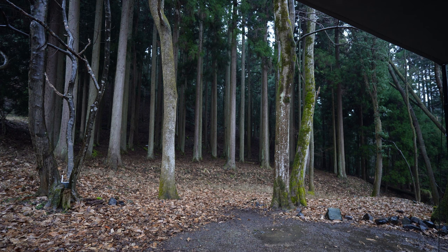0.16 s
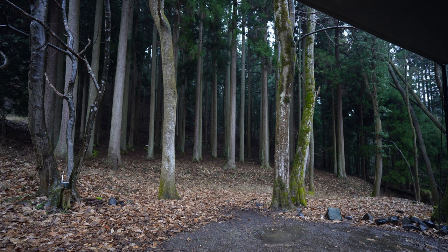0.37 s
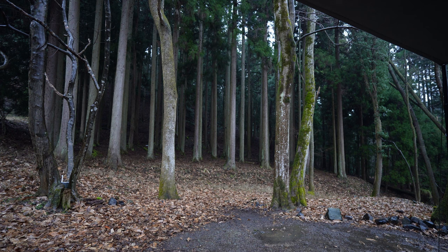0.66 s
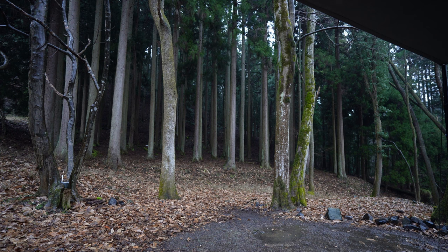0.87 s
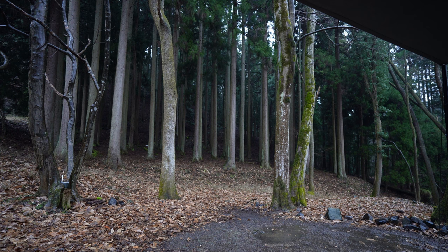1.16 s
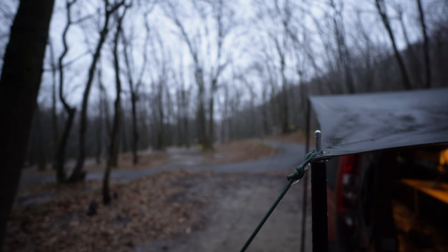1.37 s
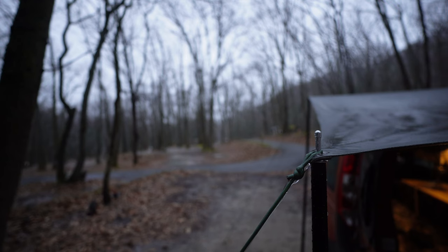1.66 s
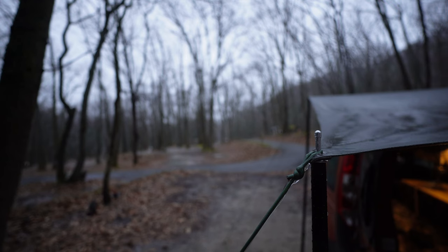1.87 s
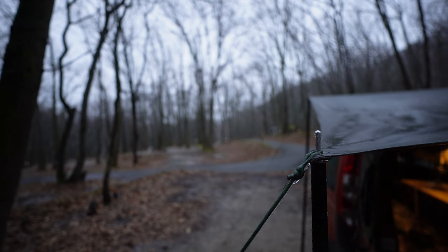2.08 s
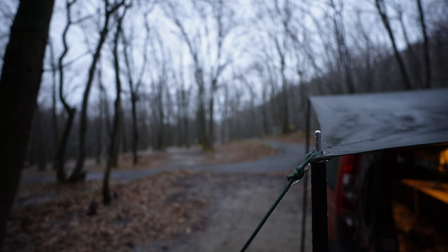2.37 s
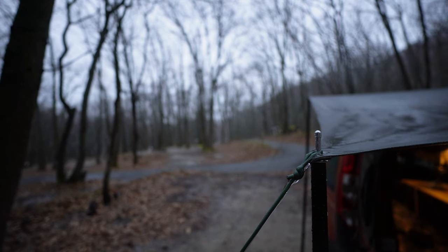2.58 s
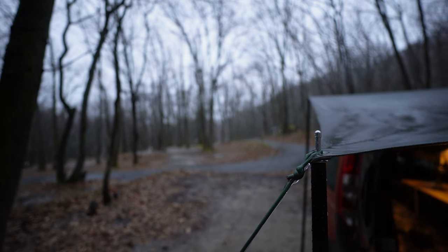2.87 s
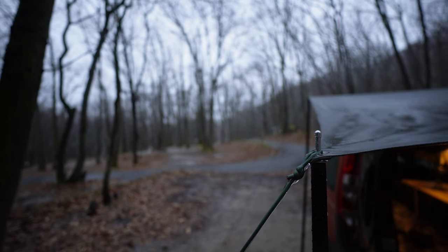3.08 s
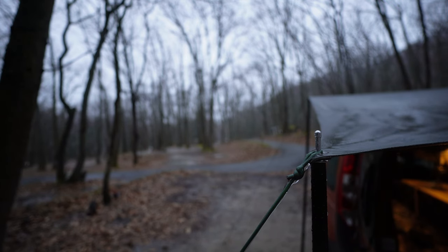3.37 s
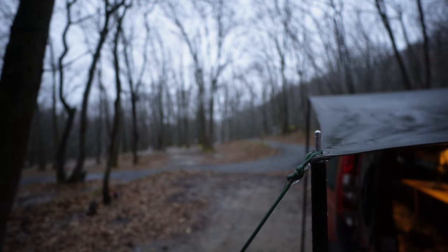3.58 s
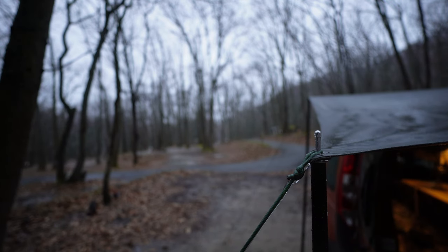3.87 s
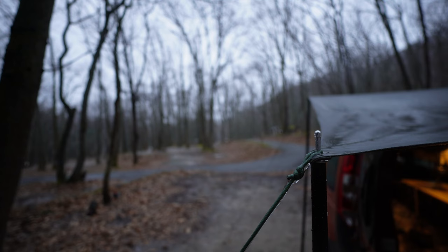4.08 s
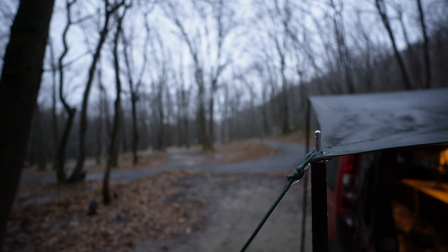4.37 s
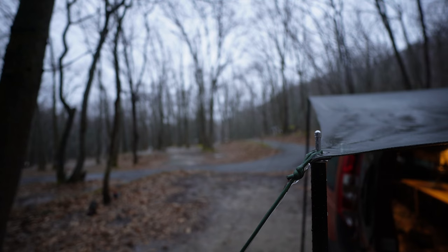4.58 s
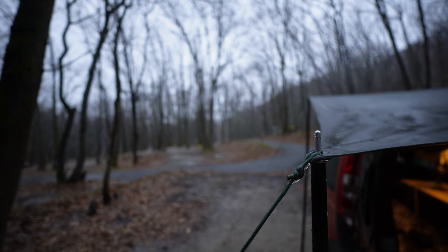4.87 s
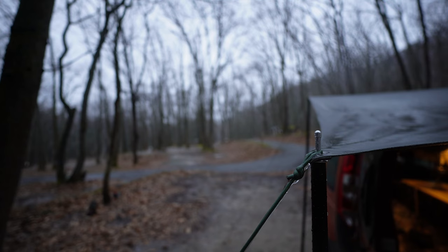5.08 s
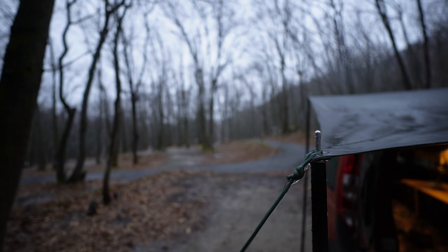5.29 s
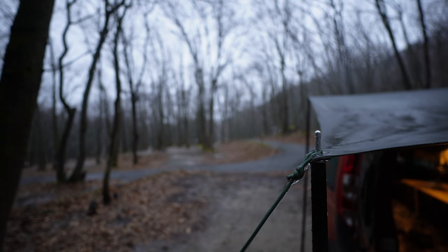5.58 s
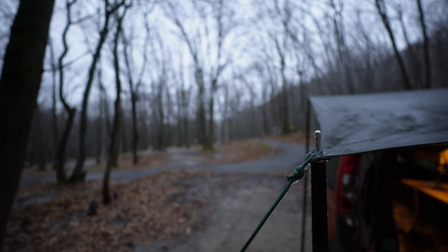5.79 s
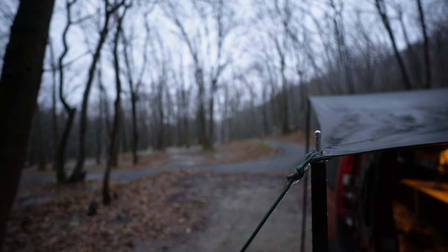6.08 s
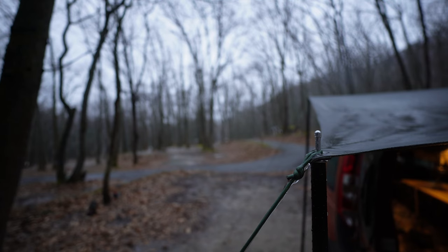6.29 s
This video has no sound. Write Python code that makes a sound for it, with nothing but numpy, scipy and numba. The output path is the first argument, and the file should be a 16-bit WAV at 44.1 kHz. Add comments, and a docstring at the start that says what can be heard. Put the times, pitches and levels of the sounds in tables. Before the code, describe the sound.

Heavy rain on a taut tarp in a wood, with big drips slapping and booming the cloth over a steady hiss.

```python
"""Heavy rain on a taut tarp in a wood, heard from just underneath. Big drips slap the cloth with a falling
ring, the whole sheet booms, and fine drops tick and splash over the hiss of rain farther off.
The microphone starts close over wet fallen leaves and blends to its place under the tarp over the first
two seconds or so. The recorder's limiter briefly ducks everything after the hardest slaps."""
import sys
import numpy as np
from scipy import signal
from scipy.fft import rfft, irfft
from scipy.io import wavfile
from scipy.ndimage import uniform_filter1d, minimum_filter1d
from numba import njit

SR = 44100
rng = np.random.default_rng(int(sys.argv[2]) if len(sys.argv) > 2 else 0)


def log_audio(samples):
    """Write samples as a 16-bit WAV file to the path given in sys.argv[1]."""
    # one column per channel
    frames = np.atleast_2d(samples).T
    # limit to full scale, then quantise
    limited = np.clip(frames, -1, 1)
    pcm = np.round(limited * 32767).astype(np.int16)
    wavfile.write(sys.argv[1], SR, pcm)


N = 284004
TOP_HZ = 16100  # upper edge of the recorder's band


def undb(db):
    return 10 ** (np.asarray(db) / 20)


def unit(x):
    return x / np.sqrt(np.mean(x ** 2))


@njit
def sum_rings(count, start, hz, t60, rise, bend, size, sr):
    """Damped sines that start at (1 + bend) times their pitch and sink to it; times in seconds."""
    out = np.zeros(count)
    for k in range(len(start)):
        first = int(start[k] * sr)
        fade = 1000. ** (-1 / (t60[k] * sr))
        open_up, sink = np.exp(-1 / (rise[k] * sr)), fade ** 2
        phase, level, shut, sharp = 0., size[k], 1., bend[k]
        for i in range(first, min(first + int(.7 * t60[k] * sr), count)):
            phase += 2 * np.pi * min(hz[k] * (1 + sharp), .45 * sr) / sr
            level, shut, sharp = level * fade, shut * open_up, sharp * sink
            out[i] -= level * (1 - shut) * np.sin(phase)
    return out


def ring(start, hz, t60, rise, bend, size):
    """One damped ring per start time; a single number applies to every ring."""
    columns = np.broadcast_arrays(np.clip(start, 0, None), hz, t60, rise, bend, size)
    return sum_rings(N, *(np.ascontiguousarray(c, float) for c in columns), float(SR))


def spray(start, db, hz, cycles, last_s, octaves, count, rise):
    """Each event throws a cluster of short rings that thin and fade over last_s; rise in cycles."""
    when, tone, strength = np.moveaxis(rng.random((len(start), count, 3)), -1, 0)
    late = last_s * when ** 2
    pitch = np.minimum(hz[:, None] * 2 ** (octaves * (2 * tone - 1)), TOP_HZ).ravel()
    size = undb(db[:, None] - 22 * late / last_s) * (2 * strength - 1)
    return ring((start[:, None] + late).ravel(), pitch, cycles / pitch, rise / pitch, 0, size.ravel())


def random_drops(per_s):
    """Start times in seconds, each with a draw from 0 to 1 for pitch and another for strength."""
    when, tone, strength = rng.random((int(per_s * N / SR), 3)).T
    return when * N / SR, tone, strength


def flicker(per_s):
    """Random levels, each held briefly, smoothed twice."""
    hold = int(SR / per_s)
    steps = np.repeat(rng.standard_normal(N // hold + 1), hold)
    return uniform_filter1d(uniform_filter1d(steps, hold), hold)[:N]


def patter(spectrum, low_hz, per_s, scatter_db, cycles, last_s, hiss_db, flicker_db):
    """Countless small drops, each a burst with its own colour and size, over the blur of distant ones."""
    hz, db = np.transpose(spectrum)
    start, tone, strength = random_drops(per_s)
    pitch = low_hz * (14000 / low_hz) ** tone ** 0.52
    # a short ring spreads its power over a band that widens with pitch
    colour_db = np.interp(np.log(pitch), np.log(hz), db) + 10 * np.log10(pitch)
    size_db = colour_db - scatter_db * np.log(1 - .97 * strength)
    drops = spray(start, size_db, pitch, cycles, last_s, octaves=0.76, count=6, rise=0.33)
    bins_hz = np.maximum(np.fft.rfftfreq(N, 1 / SR), 1)
    hiss_colour = undb(np.interp(np.log(bins_hz), np.log(hz), db))
    hiss = irfft(rfft(rng.standard_normal(N)) * hiss_colour, N)
    return unit(unit(drops) + undb(hiss_db + flicker_db * flicker(per_s=23.62)) * unit(hiss))


def rain_on_leaves():
    """Small drops strike the wet leaf litter: a bright, uneven patter."""
    # The colour of rain on leaves. Each row: frequency in Hz, relative spectral density in dB.
    spectrum = [(40, 7), (170, -3.5), (350, 6), (3000, -4), (5000, 0.5), (6300, -9), (9200, -8),
                (11500, -4.5), (15500, -7)]
    return patter(spectrum, low_hz=710, per_s=300, scatter_db=5.1, cycles=4.9, last_s=0.0055,
                  hiss_db=5.8, flicker_db=1.6)


def rain_on_tarp():
    """Small drops strike the cloth overhead: a darker, more even patter."""
    # The colour of rain on cloth. Each row: frequency in Hz, relative spectral density in dB.
    spectrum = [(40, 0), (100, 13.5), (200, -2.5), (500, 0), (1400, -11), (2600, -9.5), (6200, -22.5),
                (10000, -37), (13000, -47), (16000, -38)]
    return patter(spectrum, low_hz=558, per_s=360, scatter_db=1.8, cycles=7.5, last_s=.005,
                  hiss_db=5.15, flicker_db=1.0)


def spatter(per_s, low_hz, scatter_db):
    """Fine droplets thrown off the wet cloth and twigs: crisp treble ticks."""
    start, tone, strength = random_drops(per_s)
    pitch = low_hz * (15000 / low_hz) ** tone
    db = scatter_db * np.sqrt(-np.log(1 - .985 * strength))
    return unit(spray(start, db, pitch, cycles=8, last_s=0.0025, octaves=0.35, count=8, rise=0.3))


def drumming():
    """Drips farther off keep the sheet drumming: soft low swings at random moments."""
    start, tone, strength = random_drops(per_s=14)
    hz = 125.2 * 2 ** (0.7 * (tone - .5))
    return unit(ring(start, hz, t60=0.13, rise=0.004, bend=0.15, size=undb(17.4 * strength)))


def splashes():
    """A drop bursts on a wet leaf or puddle nearby: a tiny chirp in a spatter of droplets."""
    # The louder splashes. Each row: start in seconds, level in dB, centre pitch in Hz.
    bursts = [(0.0628, -19, 11300), (0.094, -18, 10000), (0.143, -22.5, 2560), (0.145, -12.5, 12400),
              (0.2096, -16, 11900), (0.2548, -14.5, 11800), (0.2966, -20.5, 3320), (0.352, -19, 12800),
              (0.37, -10, 13600), (0.4003, -21.5, 5400), (0.491, -24, 12700), (0.515, -24, 5070),
              (0.538, -22, 13700), (0.612, -17, 13000), (0.6495, -20, 13600), (0.661, -25.5, 4500),
              (0.6799, -6, 11000), (0.717, -19.5, 12900), (0.7277, -16.5, 8300), (0.743, -20.5, 11700),
              (0.9128, -14, 11100), (1.03, -17.5, 14100), (1.149, -20, 13400), (1.2545, -18.5, 10500),
              (1.264, -20.5, 10000), (1.474, -19, 14100), (2.3896, -19.5, 4100), (2.531, -20, 12800),
              (2.876, -24, 11400), (3.3727, -18.5, 3220), (3.4764, -21, 7350), (3.552, -29, 7250),
              (3.7142, -19, 5500), (3.84, -21, 11200), (3.9422, -17.5, 7340), (4.1403, -9.5, 2740),
              (4.5647, -16, 12000), (5.22, -20.5, 10600), (5.6148, -23.5, 8200), (5.725, -23, 8050),
              (5.903, -23.5, 9200), (6.02, -30, 11000), (6.2765, -27, 10700)]
    start, db, hz = np.transpose(bursts)
    chirp = ring(start, hz, t60=18 / hz, rise=0.000067, bend=0.11, size=undb(db + 0.5))
    last_s = 0.011 * undb(0.43 * (db[:, None] + 19.5))  # louder bursts last longer
    droplets = spray(start - .002, db + 8, hz, 3.24, last_s, octaves=0.22, count=24, rise=0.041)
    return chirp + droplets


def booms():
    """The whole sheet swings; loose cloth rattles and neighbouring modes beat against the main one."""
    # The swings of the sheet. Each row: start in seconds, level in dB, pitch in Hz.
    swings = [(0.405, -31, 65.4), (0.484, -28, 67.6), (1.052, -25.5, 93), (1.11, -32.5, 110),
              (1.247, -23.5, 118), (1.313, -23, 99), (1.415, -32, 111), (1.51, -21, 93),
              (1.593, -15, 123.4), (1.609, -11.5, 97), (1.759, -10, 110), (1.792, -12.5, 114),
              (1.824, -20.5, 95), (1.875, -23, 119), (1.89, -17, 89.5), (1.967, -13.5, 99),
              (2.182, -23.5, 120), (2.399, -15.5, 108), (2.456, -14, 148), (2.701, -13.5, 114),
              (2.837, -12.5, 106), (3.041, -22.5, 99.4), (3.106, -5.5, 133), (3.308, -21.5, 112),
              (3.361, -7, 112.3), (3.579, -20.5, 115), (3.748, -9, 102), (3.837, -9.5, 104.5),
              (3.935, -12, 144.5), (4.14, -14.5, 111), (4.295, -6, 130), (4.77, -10.5, 117),
              (5.098, -11, 119), (5.138, -23.5, 91), (5.227, -8.5, 130), (5.431, -23, 160),
              (5.522, -19, 103), (5.566, -22.5, 123), (5.672, -9, 106.4), (5.974, -20.5, 125),
              (6.015, -28, 105), (6.069, -16, 125.5), (6.277, -16, 121)]
    start, db, hz = np.transpose(swings)
    main = ring(start - .004, hz, t60=0.077, rise=0.0033, bend=0.17, size=undb(db + 7))
    rattle = spray(start - .006, db - 5, 5.65 * hz,
                   cycles=4.4, last_s=0.088, octaves=1.0, count=14, rise=0.26)
    modes = spray(start, db + 2, 1.11 * hz, cycles=10.5, last_s=0.0604, octaves=0.86, count=10, rise=0.71)
    return main + rattle + modes


def slaps():
    """A big drip dents the cloth: a pulse, a ring with papery overtones, ripples back from the edges."""
    # The louder drips just above the microphone. Each row: start in seconds, level in dB,
    # nominal pitch in Hz, relative level of the crack in dB, ring length in cycles of that pitch.
    drips = [(0.0547, -6.5, 570, 6, 4.6), (0.1114, -7.5, 610, 6, 4.7), (0.8176, -12, 654, 10.5, 6),
             (1.1096, -20, 545, 10, 3.2), (1.2835, -10, 580, -1, 5.3), (1.391, -22, 540, -8, 15),
             (1.4215, -23, 1000, -4, 5.5), (1.457, -13, 640, 8, 2.2), (1.5142, -12.5, 1130, 0.5, 7.5),
             (1.9967, -13, 535, -5, 3.7), (2.0494, -15, 655, 2.5, 6.1), (2.0842, -7, 595, -0.5, 3.7),
             (2.1335, -15, 1260, 0, 19), (2.1708, -8.5, 656, -1.5, 3.3), (2.2161, -14.5, 980, -17, 5.8),
             (2.2518, -9.5, 640, -1, 9.1), (2.381, -6, 1050, -2.5, 4.8), (2.4521, 10.5, 577, -20, 8.2),
             (2.5406, -8, 830, -3, 4.6), (2.6197, 17.5, 520, -20.5, 5.6), (2.682, -3, 486, 1, 13),
             (2.8307, -9.5, 500, 0, 7), (3.0225, -17, 905, -11, 5.5), (3.0438, -12.5, 550, -18, 7.5),
             (3.1032, 10.5, 617, -20, 9.1), (3.1667, -16, 694, -1, 3.8), (3.1928, -14, 1080, 1, 5.6),
             (3.305, -17.5, 597, -14, 5.6), (3.3574, -3.5, 402, -2, 10), (3.3728, 9, 607, -6, 8.2),
             (3.5748, -9.5, 575, -2, 5.5), (3.7432, -2.5, 525, 0, 7.2), (3.7861, -5.5, 1010, -13, 1.7),
             (3.8128, -12.5, 403, 4, 4.8), (3.8383, -4, 517, 1, 5.5), (3.8993, -15, 790, -8, 5.2),
             (3.9337, -4, 796, 3.5, 3.9), (3.9448, -5, 404, -25, 9.1), (3.9981, -10.5, 710, 0.5, 7.3),
             (4.0668, -10.5, 620, 6, 4.6), (4.1402, -7, 694, 2.5, 2), (4.2457, -14.5, 855, 5.5, 3.8),
             (4.292, 14.5, 694, -14.5, 3.4), (4.4206, -7, 655, -1.5, 9.4), (4.4825, -7.5, 610, 0, 7.4),
             (4.5554, -10.5, 700, 9.5, 6.7), (4.6209, -12, 970, 1, 3.4), (4.7483, 4.5, 670, -11.5, 10.5),
             (4.771, -4, 716, 0, 9.5), (4.8447, 14.5, 960, -19, 9.1), (4.9802, -12, 1010, 2, 4.7),
             (5.06, -15, 560, 1, 2.3), (5.097, -10, 646, 1, 8.3), (5.1167, -11.5, 745, -0.5, 5.3),
             (5.2291, 13, 380, -10.5, 5.9), (5.356, -15.5, 800, -10, 6), (5.514, -22.5, 604, 10, 4.2),
             (5.5296, -7, 910, -8, 1.7), (5.5688, -9, 600, 6.5, 8.6), (5.6687, 5, 584, -9.5, 18),
             (5.8463, -14, 850, -0.5, 7.3), (5.9225, -20.5, 560, -12, 19), (5.9696, -11, 765, 1.5, 1.8),
             (6.0702, -6, 686, -0.5, 2.4), (6.2745, -17.5, 610, 1, 4.2)]
    start, db, hz, crack_db, cycles = np.transpose(drips)
    dent_db = db + 7 - 0.76 * cycles  # drips that ring longer land softer
    dent = ring(start, 1.216 * hz, t60=2.62 / hz, rise=0.055 / hz, bend=0.38, size=undb(dent_db))
    paper = spray(start - 5e-4, db - 11.5, 2.256 * hz,
                  cycles=23, last_s=.004, octaves=0.746, count=6, rise=1.0)
    ring_db = np.minimum(db, 8)  # stretched cloth rings only so loud, however hard the dent
    cloth = ring(start + 0.00066, 0.769 * hz,
                 t60=cycles / hz, rise=0.0011, bend=0.15, size=-undb(ring_db - 1.5))
    ripples = spray(start, ring_db - 6, 0.611 * hz,
                    cycles=6.9, last_s=0.01836, octaves=1.29, count=16, rise=0.21)
    # the drop's first contact: a dull snap within a crack of fine spray
    contact_db = db + crack_db - 2
    usual_snap_hz, usual_drip_hz = 2340, 570
    snap = ring(start - 2e-4, usual_snap_hz * (hz / usual_drip_hz) ** 0.64,
                t60=1.31 / usual_snap_hz, rise=2.5e-5, bend=0.2, size=undb(contact_db))
    crack = spray(start - 7e-4, contact_db, np.full(len(start), 11500.),
                  cycles=2.6, last_s=.0045, octaves=1.1, count=32, rise=0.2)
    return dent + paper + cloth + ripples + snap + crack


def scene():
    """One microphone in the rain: the leaves recede as the tarp comes in overhead."""
    # The balance of the patter. Each row: time in seconds, level on leaves in dB, level on tarp in dB.
    balance = [(0, -36.5, -66), (.9, -36.5, -50.5), (1.3, -41, -39.5), (1.7, -45.5, -38.5),
               (2.301, -52, -37.5), (6.44, -50.5, -39)]
    times, *levels = np.transpose(balance)
    leaves_db, tarp_db = (np.interp(np.arange(N) / SR, times, db) for db in levels)
    leaves = undb(leaves_db) * rain_on_leaves()
    tarp = undb(tarp_db) * rain_on_tarp()
    twig_ticks = undb(leaves_db - 7.5) * spatter(per_s=90, low_hz=9600, scatter_db=21)
    cloth_ticks = undb(tarp_db - 20) * spatter(per_s=150, low_hz=9700, scatter_db=26)
    drips = slaps() + undb(tarp_db - 5.5) * drumming() + booms()
    return (leaves + tarp + twig_ticks + cloth_ticks + drips + splashes())[None]


@njit
def limiter_gain(over_db, release_db_per_s):
    """The cut jumps up to hold the ceiling and is let go at a steady rate."""
    cut_db = over_db.copy()
    for i in range(1, len(cut_db)):
        cut_db[i] = max(cut_db[i], cut_db[i - 1] - release_db_per_s / SR)
    return 10 ** (-cut_db / 20)


def record(dry):
    """The microphone drops deep bass and lifts the treble; the recorder limits peaks and cuts the top."""
    presence_hz, width_hz, ceiling_db = 12800, 3500, -2.6
    low_cut = signal.sosfilt(signal.butter(2, 38, "high", fs=SR, output="sos"), dry)
    presence = signal.lfilter(*signal.iirpeak(presence_hz, presence_hz / width_hz, fs=SR), low_cut)
    mic = low_cut + undb(-5.5) * presence
    peak = -minimum_filter1d(-np.abs(mic[0]), size=41)  # looks about half a millisecond ahead
    over_db = np.maximum(20 * np.log10(peak + 1e-9) - ceiling_db, 0.)
    gain = uniform_filter1d(limiter_gain(over_db, release_db_per_s=159), size=21)
    return signal.sosfilt(signal.ellip(10, .2, 70, TOP_HZ, fs=SR, output="sos"), mic * gain)


dry = scene()
out = record(dry)
log_audio(out)
```